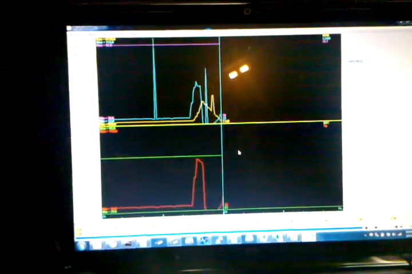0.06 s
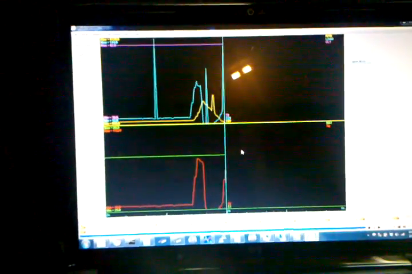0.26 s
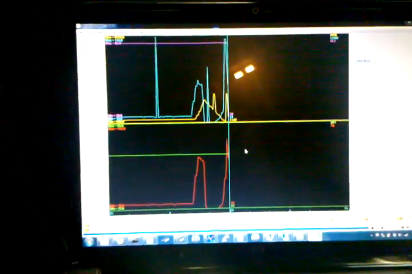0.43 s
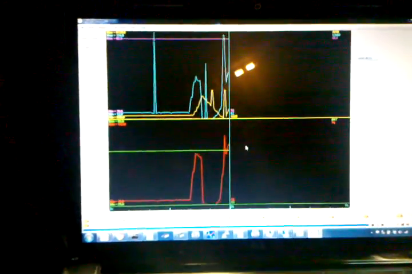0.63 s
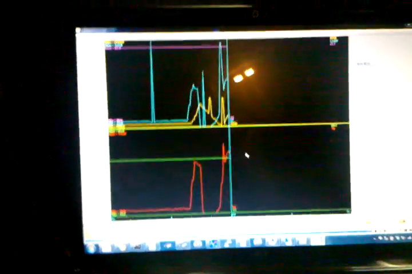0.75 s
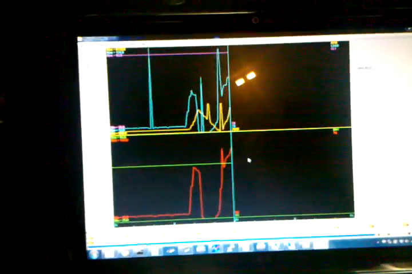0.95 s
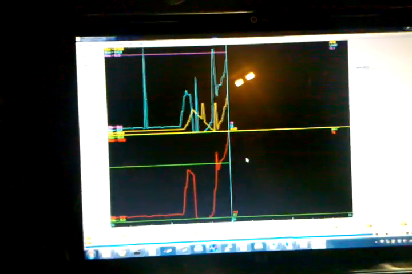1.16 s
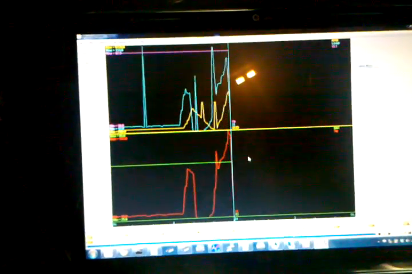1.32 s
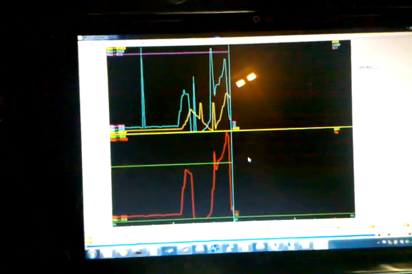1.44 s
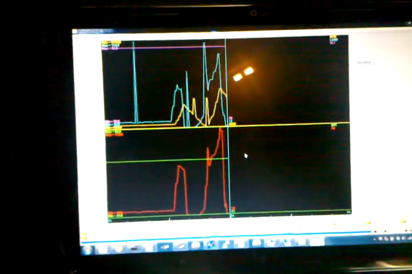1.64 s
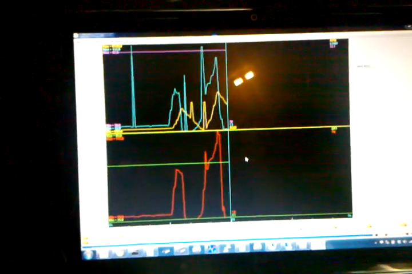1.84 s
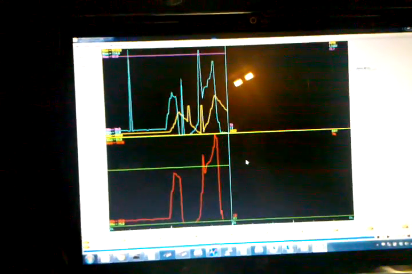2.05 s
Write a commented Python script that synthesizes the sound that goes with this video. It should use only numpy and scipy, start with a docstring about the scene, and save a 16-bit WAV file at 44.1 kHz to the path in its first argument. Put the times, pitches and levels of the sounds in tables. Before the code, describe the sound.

A turbocharged car engine revs once from idle, booming upward, then sinking under a rushing turbo hiss.

```python
"""The exhaust of a turbocharged car booms at the firing rate as the engine is revved once from idle:
a sine at that rate carries the boom, with rougher sines at its multiples. The turbo's rush is noise through
ringing pipework, under a hiss. Shaped noise gives the engine bay's rumble and roar, the puff as the throttle
opens, and the vented hiss and surge about its shutting; the rush rings on as the revs sink."""
import sys
import numpy as np
from scipy.fft import rfft, irfft, next_fast_len
from scipy.io import wavfile
from scipy.ndimage import uniform_filter1d, map_coordinates

SR = 44100
rng = np.random.default_rng(int(sys.argv[2]) if len(sys.argv) > 2 else 0)


def wav_out(sig):
    """Save sig, one row per channel (or a flat mono array), as 16-bit PCM at SR to the path in sys.argv[1]."""
    wavfile.write(sys.argv[1], SR, np.round(np.clip(np.atleast_2d(sig).T, -1, 1) * 32767).astype(np.int16))


N = 91772

# engine speed: (time [s], firing rate [Hz])
FIRING_RATE = [(0, 30.1), (0.42, 34.9), (0.56, 51.4), (0.69, 58.6), (0.78, 72.3), (0.88, 85.6),
               (0.94, 98.4), (1, 105.8), (1.11, 124.5), (1.2, 141.4), (1.27, 156.9), (1.31, 158.9),
               (1.42, 148.2), (1.56, 136.9), (1.68, 128.2), (1.8, 121.4), (1.94, 108.6), (2.08, 102.7)]
# engine rumble: (time [s], level [dB])
RUMBLE_LEVEL = [(0, -48), (.32, -57.5), (.55, -46), (.75, -57.5), (1.2, -39), (1.5, -43), (2.08, -45)]
# low roar of the engine bay, before ROAR_DB: (time [s], level [dB])
ROAR_LEVEL = [(0.0, -52), (0.22, -59.5), (0.75, -50.5), (1.13, -40), (1.17, -42.5), (1.33, -34),
              (1.56, -41.5), (1.74, -40.5), (2.08, -45.5)]
# rush of air in the turbo's pipework, shared by its plain and ringing parts: (time [s], level [dB])
RUSH_LEVEL = [(0, -49), (.16, -50.5), (.33, -57), (.45, -55), (.6, -53.5), (.85, -45.5), (1, -42.5),
              (1.29, -33), (1.35, -29), (1.55, -27), (1.72, -29.5), (1.78, -32), (2, -34), (2.08, -37)]
# hiss of the air: (time [s], level [dB])
HISS_LEVEL = [(0, -61.5), (.33, -64.5), (.42, -60.5), (.6, -57.5), (.78, -56.5), (.95, -51), (1.06, -47.5),
              (1.25, -43), (1.45, -38), (1.6, -39), (1.76, -42.5), (2.08, -48)]
# exhaust boom at the firing rate, with brief dips: (time [s], level [dB])
BOOM_LEVEL = [(0, -73), (0.47, -73), (0.6, -53), (0.73, -47.5), (0.92, -39.5), (1, -28.5), (1.13, -21.5),
              (1.178, -55), (1.21, -22.5), (1.27, -25.5), (1.35, -22.5), (1.47, -23.4), (1.54, -31.8),
              (1.575, -58), (1.62, -22), (1.79, -19), (1.95, -30.0), (2.07, -28)]
# common level of the exhaust orders: (time [s], level [dB])
BURBLE_LEVEL = [(0, -60), (.35, -61.5), (.5, -55.5), (.7, -42), (.95, -38.5), (1.2, -40), (1.4, -41.5),
                (1.7, -40.5), (2.08, -39.5)]
# exhaust orders: (multiple of the firing rate, level under throttle [dB], level coasting [dB])
EXHAUST_ORDERS = [(1.5, -0.5, -2.5), (1.75, -10.5, -16), (2, -1.5, -4), (2.25, -14.5, -15.5),
                  (2.5, -10.5, -8), (3, -9.5, -9), (3.5, -16.5, -15.5), (4, -16.5, -11)]
# resonances of the pipework: (frequency [Hz], level [dB])
DUCT_MODES = [(1013, -8), (1104, -7), (1184, -3), (1290, 2), (1310, 1), (1364, -3), (1400, -4), (1429, -3),
              (1586, 0), (1749, -5), (1801, -4), (1869, -5), (1923, -7), (2058, -5), (2230, -7),
              (2433, -12), (2798, -16)]

# relative noise spectra, each: (frequency [Hz], level [dB])
RUMBLE_SPECTRUM = [(30, -30), (50, -19.5), (130, 8), (250, 4.5), (330, 1), (450, -17), (900, -54)]
ROAR_SPECTRUM = [(60, -26), (130, -2.5), (290, 3.5), (420, -5), (580, 2), (690, -0.5), (810, 2),
                 (1000, -4.5), (1800, -24.5), (4000, -52)]
RUSH_SPECTRUM = [(400, -41), (850, -10), (1080, -1.5), (1300, 0), (1650, -2), (2050, -4), (2450, -8),
                 (3000, -21), (4000, -59)]
HISS_SPECTRUM = [(1200, -36.5), (2500, 2), (3200, -1), (4000, 0.5), (4800, .5), (6500, -2.5), (6700, 1),
                 (6900, -3), (7100, -6.5), (7300, -16), (7600, -25), (8100, -39), (9000, -28.5)]  # also colours the vent
PUFF_SPECTRUM = [(40, -21.5), (140, 15.5), (230, 9), (330, 3.5), (450, -4.5), (1300, -11), (1950, 0.5),
                 (2600, -14), (4000, -33), (9000, -64)]
SPIT_SPECTRUM = [(1200, -20), (1950, -8), (2700, -17), (3400, 2.5), (3900, 9), (4500, 1.5), (6000, -2),
                 (6800, 6.5), (7600, -19.5), (9000, -40)]
SURGE_SPECTRUM = [(700, -32), (1000, -11.5), (1190, -3.5), (1295, 3), (1400, -8), (1620, -6), (1900, -14),
                  (3000, -59)]
DUCT_DRIVE_SPECTRUM = [(500, -18), (1000, 1), (2800, 4), (4500, -28)]  # excites the duct modes

ROAR_DB = 0.5
DUCT_WIDTH_HZ, DUCT_DB, RUSH_DB = 6.7, -4, -1.5
# orders between the firing harmonics grow with the revs
UNEVEN_DB_PER_OCTAVE = 17
# each order dips slightly as it sweeps through the pipe frequency
PIPE_HZ, PIPE_WIDTH_HZ, PIPE_DB = 206, 7.9, -0.5
# the silencer dulls the orders above its corner
SILENCER_HZ = 516
# the throttle opens and shuts; the turbo starts to vent just before it shuts
OPEN_S, SHUT_S, VENT_S = 0.452, 1.315, 1.265
SHUT_TAKES_S = 0.064  # time scale of the change from load to coasting
TOP_HZ = 8600


def amp(db):
    """Level law: decibels to amplitude gain."""
    return 10 ** (np.asarray(db) / 20)


def unit(x):
    """Normalisation: scale a signal to rms 1."""
    return x / np.sqrt(np.mean(x ** 2) + 1e-20)


def curve(rows):
    """Linear interpolation: one value per sample from (time [s], value) rows."""
    return np.interp(np.arange(N) / SR, *np.transpose(rows))


def wobble(rate):
    """Slow random modulation: a smooth curve through rate random knots a second."""
    knots = rng.standard_normal(int(N * rate / SR) + 4)
    return map_coordinates(knots, [np.arange(N) * rate / SR])


def filtered(x, response):
    """Linear filtering: multiply the spectrum of x by a response of frequency [Hz]."""
    m = next_fast_len(N + SR // 2)  # padding keeps the tail from wrapping round
    spectrum = rfft(x, m) * response(np.fft.rfftfreq(m, 1 / SR))
    return irfft(spectrum, m)[:N]


def noise(colour):
    """Spectral shaping: white noise filtered to a spectrum, at rms 1."""
    f, db = np.transpose(colour)

    def response(hz):
        return amp(np.interp(np.log(hz + 1), np.log(f), db))

    return unit(filtered(rng.standard_normal(N), response))


def engine_bay(phase, idle_throb=0.2, throb_fade_hz=70):
    """Amplitude modulation: rumble and roar throb with the separate firings, most at idle."""
    rumble = amp(curve(RUMBLE_LEVEL)) * noise(RUMBLE_SPECTRUM)
    roar = amp(curve(ROAR_LEVEL) + ROAR_DB) * noise(ROAR_SPECTRUM)
    depth = idle_throb * np.exp(-(curve(FIRING_RATE) / throb_fade_hz) ** 2)
    return (rumble + roar) * (1 + depth * np.cos(phase))


def burst(colour, start_s, db, attack_s, hold_s, fall_db_per_s):
    """Transient flow noise: air rises exponentially, then dies away once hold_s has passed from the start."""
    age = np.maximum(np.arange(N) / SR - start_s, 0)
    attack = 1 - np.exp(-age / attack_s)
    decay = amp(db - fall_db_per_s * np.maximum(age - hold_s, 0))
    return decay * attack * noise(colour)


def throttle():
    """Pressure release: a low puff and bright spit on opening, vented hiss and trapped boost about shutting."""
    puff = burst(PUFF_SPECTRUM, OPEN_S, db=-44, attack_s=0.0058, hold_s=0.051, fall_db_per_s=89.5)
    spit = burst(SPIT_SPECTRUM, OPEN_S, db=-53.5, attack_s=0.0063, hold_s=0.02, fall_db_per_s=166)
    surge = burst(SURGE_SPECTRUM, SHUT_S, db=-27, attack_s=0.025, hold_s=0.12, fall_db_per_s=220)
    vent = burst(HISS_SPECTRUM, VENT_S, db=-36.5, attack_s=0.032, hold_s=0.12, fall_db_per_s=170.5)
    return puff + spit + surge + vent


def duct_response(hz):
    """Modal superposition: narrow resonances of the pipework, added with alternating sign."""
    total = 0
    for k, (mode_hz, db) in enumerate(DUCT_MODES):
        damping = 1j * hz * DUCT_WIDTH_HZ
        total = total + (-1) ** k * amp(db) * damping / (mode_hz ** 2 - hz ** 2 + damping)
    return total


def turbo(phase, chop=0.052, cycle_chop=0.033, flutter_db=0.56):
    """Resonance and modulation: flow noise rings in pipes, lightly chopped by the valves, under smooth hiss."""
    plain = amp(RUSH_DB) * noise(RUSH_SPECTRUM)
    ringing = amp(DUCT_DB) * unit(filtered(noise(DUCT_DRIVE_SPECTRUM), duct_response))
    # chopped at twice and at a quarter of the firing rate
    valves = 1 + chop * np.cos(2 * phase) + cycle_chop * np.cos(phase / 4)
    level = amp(curve(RUSH_LEVEL) + flutter_db * wobble(30))
    hiss = amp(curve(HISS_LEVEL)) * noise(HISS_SPECTRUM)
    return level * valves * (plain + ringing) + hiss


def coasting():
    """Smooth transition: near 0 while the throttle is open, towards 1 once it has shut."""
    return 0.5 + 0.5 * np.tanh((np.arange(N) / SR - SHUT_S) / SHUT_TAKES_S)


def exhaust(rate, phase, boom_rough=0.015, rough=0.24, sway_db=2):
    """Order synthesis: a clean boom at the firing rate, plus rough orders from the unequal cylinders."""
    swell = uniform_filter1d(boom_gain(), size=600)
    boom = swell * (1 + boom_rough * wobble(48)) * np.sin(phase)
    shut, burble = coasting(), np.zeros(N)
    for k, load_db, coast_db in EXHAUST_ORDERS:
        order_hz = k * rate
        throttle_db = load_db + (coast_db - load_db) * shut
        pipe_db = PIPE_DB / (1 + ((order_hz - PIPE_HZ) / PIPE_WIDTH_HZ) ** 2)
        uneven_db = UNEVEN_DB_PER_OCTAVE * np.log2(rate / rate.max()) * (k != round(k))
        level = amp(throttle_db + pipe_db + uneven_db)
        level = level * (1 + rough * wobble(24.9)) * amp(sway_db * wobble(8.92))
        level = level / np.sqrt(1 + (order_hz / SILENCER_HZ) ** 4)
        jitter = rough * wobble(14)  # radians
        burble += level * np.sin(k * phase + rng.uniform(0, 2 * np.pi) + jitter)
    return np.sqrt(2) * (boom + amp(curve(BURBLE_LEVEL)) * burble)  # sqrt(2): sine peak from rms


def boom_gain():
    """Amplitude envelope: the boom's levels become gains before they are interpolated."""
    return curve([(s, amp(db)) for s, db in BOOM_LEVEL])


def scene():
    """Superposition: the firing phase, the integral of the rate, drives exhaust, bay and turbo."""
    rate = curve(FIRING_RATE)
    phase = 2 * np.pi * np.cumsum(rate) / SR
    return (engine_bay(phase) + throttle() + turbo(phase) + exhaust(rate, phase))[None]


def record(dry):
    """Band limitation: nothing at or above TOP_HZ passes."""
    return filtered(dry[0], lambda hz: hz < TOP_HZ)[None]


dry = scene()
out = record(dry)
wav_out(out)
```